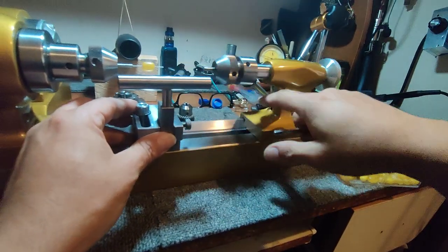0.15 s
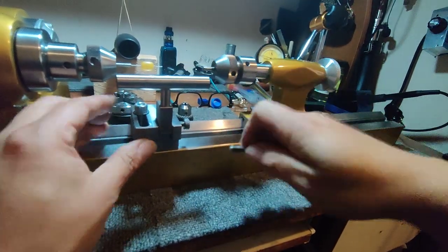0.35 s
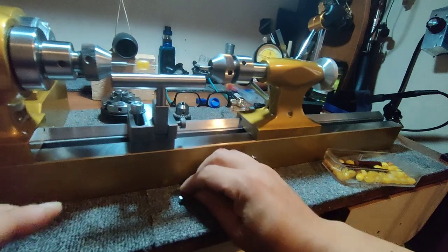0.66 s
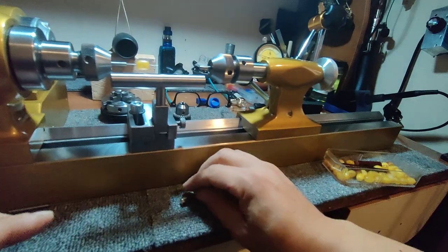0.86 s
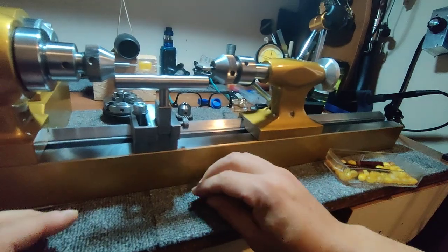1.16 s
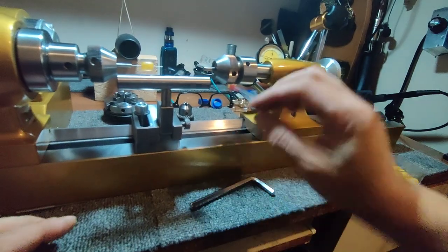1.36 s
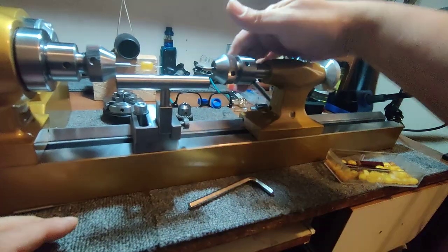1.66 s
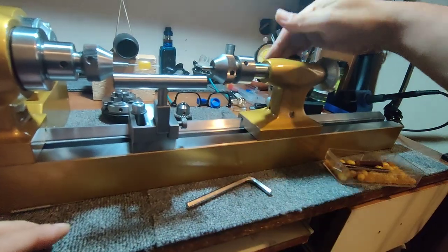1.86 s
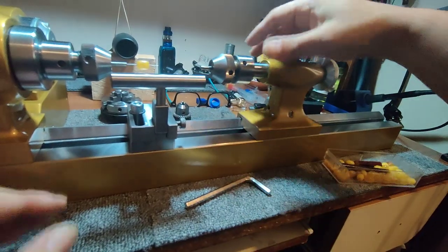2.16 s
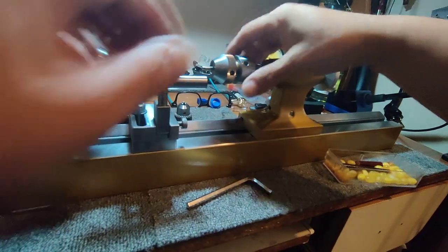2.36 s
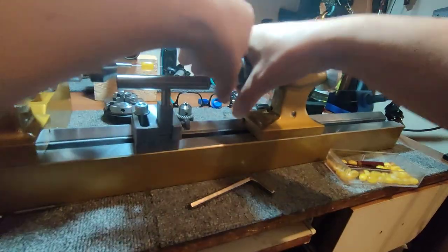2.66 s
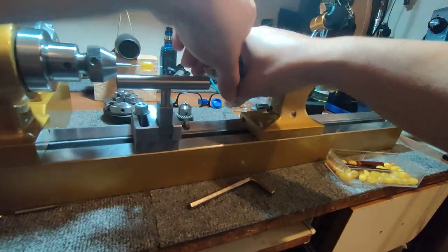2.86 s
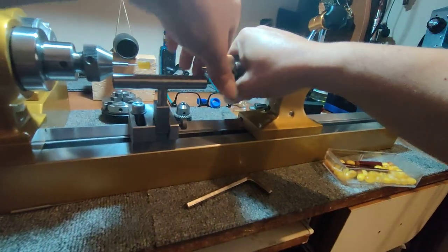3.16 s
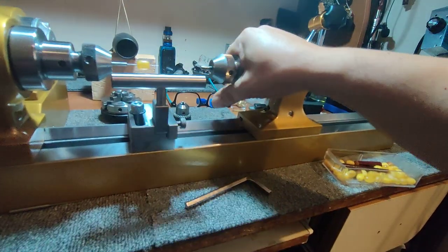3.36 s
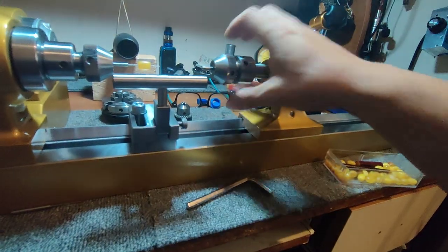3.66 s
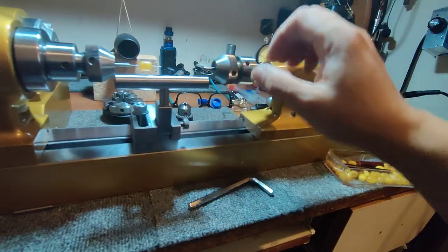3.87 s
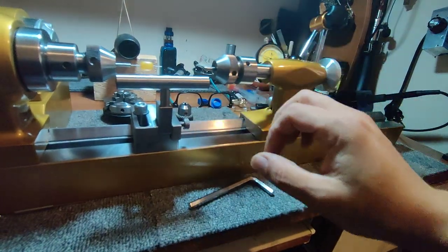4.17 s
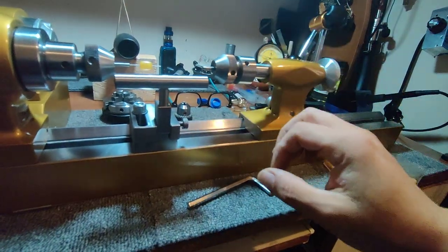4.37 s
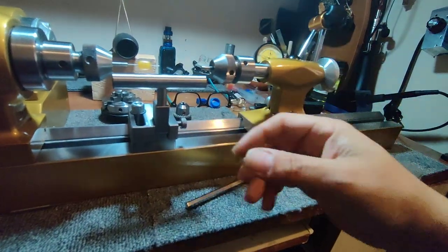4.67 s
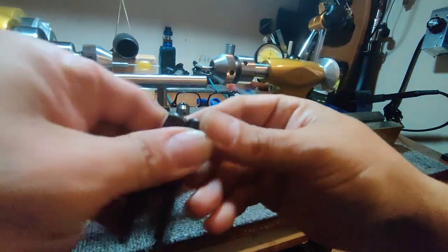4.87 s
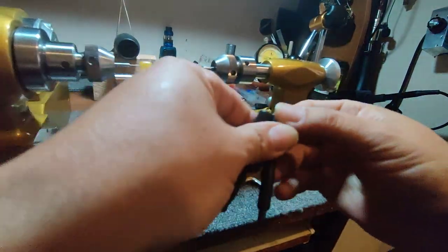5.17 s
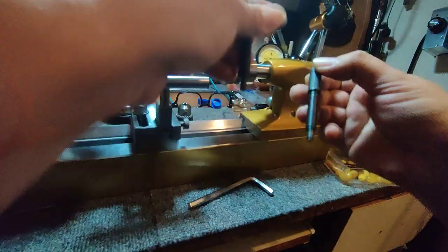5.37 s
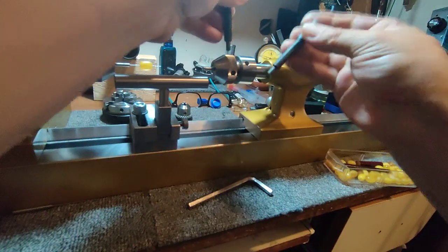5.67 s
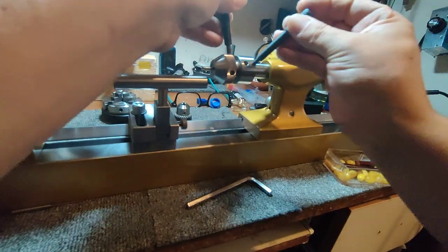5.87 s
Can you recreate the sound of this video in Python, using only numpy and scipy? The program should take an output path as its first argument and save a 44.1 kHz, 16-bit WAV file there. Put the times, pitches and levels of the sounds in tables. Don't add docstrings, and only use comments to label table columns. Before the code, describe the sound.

A quiet small workshop, close stereo microphone, short dry room reflections. The first 0.7 s is almost silent, with faint board taps and a tiny stick-slip squeak at 0.1-0.2 s. At 0.7 s a hex key lands on felt-covered wood: soft thud, thin clear ring; faint hiss then opens up. Light bumps at 1.25 s, low camera jolts and brushing near 1.7 s, a short scrape at 1.8 s, then dull metal-on-wood clunks at 1.85 and 1.92 s. Quiet handling and low rumbles follow, with a small tap and scrape near 3.15 s. At 4.1-4.45 s steel parts knock in rapid bright clicks, strongest at 4.18 s, with a sharp rub at 4.28 s. A faint breathy whistle slides from 4.45 to 5.1 s. At 5.0 s one very loud, crisp, damped pin click dominates. Tiny ticks continue to 5.65 s, then soft thumps and knocks at 5.9-6 s. A faint distant appliance hum lies beneath.

```python
import sys
import numpy as np
from scipy import signal
from scipy.fft import rfft, irfft
from scipy.io import wavfile
from scipy.ndimage import uniform_filter1d

SR = 44100
rng = np.random.default_rng(int(sys.argv[2]) if len(sys.argv) > 2 else 0)


def gain_from_db(level_db):
    decades = np.asarray(level_db, float) / 20
    return 10 ** decades


def transcribe(u):
    v = np.clip(np.atleast_2d(u).T, -1, 1)
    q = np.round(v * 32767).astype(np.int16)
    wavfile.write(sys.argv[1], SR, q)


N = 265041

# [f/Hz, level/dB per Hz]
CONTACT = [(350, -9.5), (600, -14.5), (1910, -10.5), (2160, -12.5), (2600, -7), (3230, -11.5), (6000, -12),
           (8290, -35.5), (15000, -57)]
# [f/Hz, level/dB per Hz]
TICK = [(530, -36), (900, -17), (1300, -4), (1630, -0.5), (3970, -10), (4620, 1.5), (7060, 1.5),
        (8760, -13), (12000, -45), (15600, -65.5), (22000, -120)]
# [t/s, peak level/dB, L-R level/dB]
KEY_DROPS = [
    (0.6923, -49.5, -1),
    (0.7021, -40, 10),
]
# [t/s, effort level/dB]
EFFORT = [(0.0, -72.5), (0.22, -73.5), (0.35, -84.5), (0.74, -91), (0.87, -74.5), (1.39, -71), (1.89, -66),
          (2.07, -69), (2.5, -71), (3.1, -62.5), (3.31, -68), (3.97, -71.5), (4.25, -60), (4.45, -66.5),
          (4.67, -69.5), (5.12, -65.5), (5.51, -63), (6.01, -69.5)]


def evened(x):
    return x / np.sqrt(np.mean(x ** 2) + 1e-20)


def read(points, hz):
    f, value = np.transpose(points)
    return np.interp(np.log(hz + 1), np.log(f + 1), value)


def column(rows, t, order=1):
    return np.interp(t, np.array(rows)[:, 0], np.array(rows)[:, order])


def add(mix, s, sound, pan_db, lag):
    for side, sign in enumerate((1, -1)):
        start = max(round(s * SR + sign * lag / 2), 0)
        part = mix[side, start:][:len(sound)]
        part += gain_from_db(sign * pan_db / 2) * sound[:len(part)]


def ring(modes, spread_db=0, rise=.0003, length=.9):
    hz, db, t60 = np.transpose(modes)[:, :, None]
    t = np.arange(round(length * SR)) / SR
    level_chance, phase_chance = rng.standard_normal((2, len(hz), 1))
    decay = gain_from_db(db + spread_db * level_chance - 60 * t / t60)
    x = (decay * np.sin(2 * np.pi * hz * t + spread_db * phase_chance)).sum(0)
    x = x * (1 - np.exp(-t / rise))
    return x / abs(x).max()


def crack(colour, t60, rise=0.00019, size=4096):
    t = np.arange(size) / SR
    gain = gain_from_db(read(colour, np.fft.rfftfreq(size, 1 / SR)))
    x = irfft(rfft(rng.standard_normal(size)) * gain)
    x = x * gain_from_db(-60 * t / max(t60, .003)) * (1 - np.exp(-t / rise))
    return x / abs(x).max()


def click(colour):
    x = np.roll(irfft(gain_from_db(read(colour, np.fft.rfftfreq(4096, 1 / SR)))), 24)
    impulse = x / abs(x).max() * (np.arange(len(x)) < 300)
    return impulse + 0.42 * np.roll(crack(colour, 0.0083), 24)


def resonate(x, hz, width):
    turn = np.exp(2j * np.pi * np.cumsum(hz * np.ones(len(x))) / SR)
    r = np.exp(-np.pi * width / SR)
    return 2 * (turn * signal.lfilter([1 - r], [1, -r], x / turn)).real


def tailstock_knocks():
    # [t/s, peak level/dB, ring level/dB, L-R level/dB]
    knocks = [(4.1237, -47.5, -3.5, -5), (4.137, -51, -20, 5), (4.1505, -41, -13, 1), (4.1575, -56, -20, 3),
              (4.164, -49, -16, 3), (4.1757, -21, -17, 10), (4.1783, -18, -13, 5), (4.1806, -23.5, -11, -2),
              (4.1843, -27, -8, 10), (4.1905, -44, -18, 3), (4.2455, -31.5, -10, 8.5), (4.268, -50, -24, 4),
              (4.271, -37, -19, 8), (4.2745, -48, -21, 4), (4.2785, -37, -12, 13), (4.283, -29, -9, 12),
              (4.2872, -27.5, -20, 10), (4.2905, -28.5, -8, 6), (4.2945, -44, -18, 3), (4.299, -45, -22, 3),
              (4.305, -52, -20, 3), (4.3597, -36.5, -22, 8), (4.4105, -50, -16, -2),
              (4.4262, -38.5, -16, 6), (4.436, -43, -20, 8), (5.878, -46.5, -19, 5.5),
              (5.9665, -44.5, -10.5, 7)]
    # [f/Hz, level/dB per Hz]
    snap = [(590, -55), (1100, -23), (1900, -5), (3450, -7.5), (4300, 0.5), (6200, 7.5), (8100, -6),
            (8790, -25), (14900, -49), (16300, -67)]
    # [f/Hz, level/dB per Hz]
    glint = [(7000, -50), (9000, -2), (15000, -7), (16200, -40)]
    # [f/Hz, level/dB, t60/s]
    quill = [(2020, -17, .04), (4600, -16, .04), (6160, -11, .06), (7730, -7, .09), (7810, -3, .12),
             (7895, 0, .11), (8035, -5, .09)]
    hard_db, brightens_db_per_db = -7, 1.23
    out = np.zeros((2, N))
    for s, db, ring_db, pan_db in knocks:
        glint_db = db + brightens_db_per_db * (db - hard_db)
        add(out, s, gain_from_db(db) * click(snap), pan_db, lag=-20)
        add(out, s, gain_from_db(glint_db) * crack(glint, 0.0078, rise=.0001), pan_db, lag=-9)
        add(out, s, gain_from_db(db + ring_db) * ring(quill, spread_db=3.5, length=.4), pan_db, lag=-18)
    return out


def casting_clunks():
    # [t/s, peak level/dB, ring level/dB, L-R level/dB]
    clunks = [
        (1.851, -45, -11, 0),
        (1.859, -42, -9, 2),
        (1.863, -45, 7.5, 2),
        (1.9138, -31.5, -2.5, 8),
        (1.9175, -32, -4.5, -9),
        (1.9205, -36, -5, -11),
        (4.0885, -58, -1, 6),
    ]
    # [f/Hz, level/dB, t60/s]
    casting = [(980, -1.5, 0.063), (1284, 8, 0.053), (1900, 0, 0.05), (2526, 0.5, .06), (3750, -7, 0.046),
               (5300, -4, 0.046), (5860, -14, 0.055), (6170, -6, 0.06)]
    out = np.zeros((2, N))
    for s, db, ring_db, pan_db in clunks:
        add(out, s, gain_from_db(db) * crack(CONTACT, 0.012, rise=0.00028), pan_db, lag=8.6)
        add(out, s, gain_from_db(db + ring_db) * ring(casting, spread_db=4.5, length=.2), pan_db, lag=8)
    return out


def pins_clink():
    # [f/Hz, level/dB]
    pins = [(150, -25), (620, -39), (1250, -46), (2300, -38), (2910, -27), (4300, -28), (5340, -24),
            (6200, -5), (7250, 0), (8900, -29), (10400, -28), (11200, -31), (12600, -36), (14700, -34)]
    # [f/Hz, level/dB, t60/s]
    pins_after = [(6030, -7, .03), (7000, -6, .03), (7120, 0, .03), (7800, -4.5, 0.025), (8600, -20.5, .06),
                  (10350, -29, 0.077), (11300, -31, .09)]
    touch_s, press_s = 5.00098, .0012
    contact_s, early_s = 0.0012, 0.00033
    out = np.zeros((2, N))
    hz, db = np.transpose(pins)[:, :, None]
    t = np.arange(400) / SR - press_s
    x = (gain_from_db(db) * np.cos(2 * np.pi * hz * t)).sum(0)
    x = x * np.exp(-((t + early_s) / contact_s) ** 2)
    x = x * (1 - np.exp(-(t + press_s) / .0001))
    add(out, touch_s, gain_from_db(-2.5) * x / abs(x).max(), -1., lag=-1)
    after = ring(pins_after, spread_db=2, rise=.002, length=.12)
    add(out, touch_s + press_s, gain_from_db(-25.5) * after, -1., lag=-4)
    return out


def key_landings():
    out = np.zeros((2, N))
    for s, db, pan_db in KEY_DROPS:
        add(out, s, gain_from_db(db) * crack(TICK, 0.0096), pan_db, lag=2.1)
    return out


def key_ring():
    # [f/Hz, level/dB, t60/s]
    key_modes = [(1954, -19, 0.8), (3144, -2.5, 0.7), (4366, -2.5, 0.58), (6293, -11.5, 0.068),
                 (8575, -1.5, 0.13), (9398, -7, 0.16)]
    out = np.zeros((2, N))
    for s, db, pan_db in KEY_DROPS:
        tone = ring(key_modes)
        felt = 1 + 1.76 * np.exp(-np.arange(len(tone)) / (0.013 * SR))
        add(out, s, gain_from_db(db) * tone * felt, pan_db, lag=2.83)
    return out


def light_ticks():
    # [t/s, peak level/dB, pitch f/Hz, L-R level/dB]
    ticks = [
        (5.0442, -45, 6850, 10),
        (5.112, -53, 6200, 8),
        (5.135, -47, 2320, 5.5),
        (5.155, -55, 1850, 12),
        (5.239, -35, 6840, 2.5),
        (5.2555, -40, 6100, 6),
        (5.27, -46, 1920, -12),
        (5.3099, -51, 1590, 1.5),
        (5.611, -49, 6200, 1),
        (5.644, -52.5, 5930, 4),
    ]
    out = np.zeros((2, N))
    for s, db, hz, pan_db in ticks:
        tick = crack(TICK, t60=0.02)
        add(out, s, gain_from_db(db) * (tick + 1.46 * resonate(tick, hz, 416.7)), pan_db, lag=-2.5)
    return out


def screw_squeak():
    # [t/s, second partial f/Hz, level/dB]
    squeak = [
        (0.1, 1820, -96),
        (0.114, 1597, -79),
        (0.147, 1870, -67.5),
        (0.182, 1846, -69),
        (0.23, 1530, -82),
    ]
    # [start t/s, end t/s, f/Hz, level/dB]
    chirp = (.03, .07, 2370, -69)
    out = np.zeros((2, N))
    t = np.arange(squeak[0][0], squeak[-1][0], 1 / SR)
    jitter = 1.01 + 0.19 * uniform_filter1d(rng.standard_normal(len(t)), size=150)
    turns = np.cumsum(column(squeak, t) / 2 * jitter) / SR
    partials_db = (-7, 3, -20, -30)
    tone = sum(gain_from_db(db) * np.sin(2 * np.pi * k * turns) for k, db in enumerate(partials_db, 1))
    tone = tone * signal.windows.tukey(len(t), .15)
    add(out, t[0], gain_from_db(column(squeak, t, order=2)) * tone, 1.5, lag=-4.5)
    start, end, hz, db = chirp
    t = np.arange(start, end, 1 / SR)
    add(out, start, gain_from_db(db) * np.sin(2 * np.pi * hz * t) * np.hanning(len(t)), .5, lag=-6)
    return out


def tailstock_glide():
    # [t/s, resonance f/Hz, level/dB]
    glide = [
        (4.45, 1481, -67),
        (4.52, 1520, -63),
        (4.56, 1544, -60.5),
        (4.66, 1580, -61.5),
        (4.72, 1565, -65.5),
        (4.82, 1476, -73.5),
        (4.9, 1530, -78),
        (4.97, 1370, -70.5),
        (5.1, 1380, -80.5),
    ]
    out = np.zeros((2, N))
    t = np.arange(glide[0][0], glide[-1][0], 1 / SR)
    hz = column(glide, t)
    hum = resonate(resonate(rng.standard_normal(len(t)), hz, 70), hz, 90)
    hum = hum / np.sqrt(uniform_filter1d(hum ** 2, size=1500) + 1.1 * hum.var())
    hum = hum * signal.windows.tukey(len(t), .2)
    add(out, t[0], gain_from_db(column(glide, t, order=2)) * hum, .5, lag=-6.5)
    return out


def scrapes():
    # [t/s, length/s, centre f/Hz, width/Hz, rms level/dB]
    strips = [(1.018, 0.048, 5450, 2610, -74.5), (1.276, 0.028, 1810, 1800, -76),
              (1.707, 0.014, 1360, 1490, -63.5), (1.781, 0.029, 4440, 900, -68),
              (1.805, 0.018, 6050, 1190, -53.5), (1.854, 0.0175, 4500, 4160, -56),
              (1.854, 0.017, 980, 250, -47.5), (3.154, 0.048, 6250, 900, -63),
              (3.33, 0.041, 6100, 1200, -74.5), (3.949, 0.052, 1500, 1500, -74),
              (3.952, 0.043, 5750, 1000, -62), (4.085, 0.046, 1420, 1430, -59),
              (4.266, 0.034, 4900, 3970, -62), (4.125, 0.056, 6300, 1000, -59.5),
              (4.13, 0.084, 2700, 2500, -60.5), (4.402, 0.038, 1800, 500, -62),
              (4.894, 0.036, 1900, 1500, -71.5), (4.264, .038, 2010, 1490, -50),
              (4.75, 0.076, 4900, 3200, -69.5), (5.52, 0.032, 5100, 3490, -70)]
    out = np.zeros((2, N))
    for s, length, hz, width, db in strips:
        patches = evened(uniform_filter1d(rng.standard_normal(4096), size=40))
        grains = rng.standard_normal(4096) * gain_from_db(2.3 * patches)
        sound = evened(resonate(resonate(grains, hz, width), hz, width))[:round(length * SR)]
        add(out, s, gain_from_db(db) * sound * signal.windows.tukey(len(sound), .6), 5.5, lag=-2.5)
    return out


def bench():
    # [t/s, peak level/dB, boom level/dB, scuff level/dB, L-R level/dB]
    top_blows = [(0.017, -67.5, -22, -20, 2), (0.074, -59, 2.5, -10, -1), (0.265, -64.5, -23, -26, 8),
                 (0.326, -65, 0, -24, 2), (0.409, -73.5, 3.5, 6, -8), (0.697, -41, -2.5, -13, 0),
                 (1.241, -49.5, -7.5, -14.5, 13), (1.706, -50, -1, -26, 1), (1.767, -51, -26, -14, 5),
                 (1.852, -33.5, -18, -5.5, 0), (1.923, -32.5, 3.5, -22, -19), (3.117, -63, 3, -10, 3),
                 (3.175, -43.5, -20, -12, 0), (3.944, -63, -27, 12, 3), (4.288, -46, -32, 1.5, 17),
                 (4.361, -47, -18, 3, 3.5), (5.879, -42, -21.5, -10, 2), (5.908, -42, -32.5, -13.5, 6),
                 (5.968, -39.5, -11, -11, 3)]
    # [t/s, peak level/dB, boom level/dB, scuff level/dB, L-R level/dB]
    apron_blows = [
        (1.274, -50, -30, -1.5, -1),
        (1.913, -31, -0.5, 2, 3.5),
        (4.087, -44, -25, -9, -2),
        (4.11, -49.5, -11, -1.5, 4),
        (4.418, -48, -31, 1.5, 12),
    ]
    # [f/Hz, level/dB per Hz]
    boards_colour = [(88, -49), (150, -13.5), (188, -9.5), (424, -4.5), (724, -14.5), (800, -19.5),
                     (901, -12.5), (1120, -25), (1600, -26), (2080, -71), (3520, -120)]
    # [f/Hz, level/dB, t60/s]
    cabinet = [(116.8, -3.5, 0.15), (212.6, -11, 0.11), (77.8, -12, 0.18)]
    top_hz, apron_hz = 423, 250
    blows = [(top_hz, *row) for row in top_blows] + [(apron_hz, *row) for row in apron_blows]
    out = np.zeros((2, N))
    for hz, s, db, boom_db, scuff_db, pan_db in blows:
        boards = crack(boards_colour, 0.18, rise=0.0023, size=8192)
        boards = boards + 2.4 * resonate(boards, hz, 67)
        add(out, s, gain_from_db(db) * boards / abs(boards).max(), 0.12 * pan_db, lag=8)
        add(out, s, gain_from_db(db + boom_db) * ring(cabinet, rise=0.0084, length=.4), .1, lag=0)
        add(out, s, gain_from_db(db + scuff_db) * crack(CONTACT, 0.07, rise=0.001), pan_db, lag=4.8)
    return out


def walls(x):
    # [f/Hz, t60/s]
    wall_t60 = [(100, 0.29), (500, 0.13), (2000, 0.21), (6000, 0.14), (12000, 0.038)]
    taps = np.zeros((2, SR // 2))
    starts = np.arange(80, SR // 2 - 20, 20)
    at = starts + rng.integers(0, 20, (2, len(starts)))
    np.put_along_axis(taps, at, rng.choice([-1., 1.], at.shape), 1)
    hz, t, z = signal.stft(taps, SR, nperseg=256)
    z = np.where(hz[:, None] < 400, z[0], z)
    decay = gain_from_db(-60 * t / np.maximum(read(wall_t60, hz), .02)[:, None])
    tail = signal.istft(z * decay, SR, nperseg=256)[1]
    tail = tail * (1 - np.exp(-np.arange(tail.shape[1]) / (0.0042 * SR)))
    return signal.fftconvolve(x, tail / np.linalg.norm(tail[0]), axes=1)[:, :N]


def noise(colour, size, patchy_db):
    # [f/Hz, correlation/1]
    likeness = [(35, 0.37), (70, 0.47), (150, 0.8), (380, .79), (950, 0.0), (2380, 0.15), (15000, -0.094)]
    # [f/Hz, phase/rad]
    lead = [(60, 0), (640, -.5), (2330, -2.5), (16000, -3)]
    # [f/Hz, L-R level/dB]
    balance = [(60, 4), (180, -1.5), (550, -1.5), (1650, 0.0), (4970, 0.1), (15000, -0.5)]
    frames, hz = 4 * N // size + 5, np.fft.rfftfreq(size, 1 / SR)
    a, b, c, d, patches = rng.standard_normal((frames, len(hz), 5)).T
    patches = uniform_filter1d(patches, size=10, axis=0)
    patches = evened(uniform_filter1d(patches, size=12, axis=1))
    same = np.clip(read(likeness, hz), -.5, 1)[:, None]
    left = a + 1j * b
    right = same * left + np.sqrt(1 - same ** 2) * (c + 1j * d)
    right = right * np.exp(-1j * read(lead, hz))[:, None]
    lean = gain_from_db(read(balance, hz) / 2)[:, None]
    inside = ((hz >= colour[0][0]) & (hz <= colour[-1][0]))[:, None]
    gain = gain_from_db(read(colour, hz)[:, None] + patchy_db * patches) * inside
    z = np.array([left * lean, right / lean]) * gain
    return evened(signal.istft(z, nperseg=size, noverlap=3 * size // 4)[1][:, :N])


def steadied(x):
    return x / np.sqrt(uniform_filter1d((x ** 2).mean(0), size=5000) + .05)


def swells(top, rise, fall, db, rest_db):
    t = np.arange(0, N, 64)[:, None] / SR
    away = np.where(t < top, (top - t) / np.abs(rise), (t - top) / np.abs(fall))
    power = (gain_from_db(db - 12 * away) ** 2).sum(1)
    return np.sqrt(np.interp(np.arange(N) / SR, t[:, 0], power) + gain_from_db(rest_db) ** 2)


def rubbing():
    # [top t/s, rise/s, fall/s, level/dB]
    strokes = [
        (0.95, 0.17, 0.21, -75),
        (1.36, 0.33, 0.75, -70),
        (1.81, 0.5, 0.49, -66),
        (3.05, 1., 0.3, -70),
        (3.9, 0.68, 0.65, -70),
        (4.28, 0.12, 0.052, -56.5),
        (4.48, 0.39, 0.16, -63),
        (5.02, 0.098, 0.23, -67.5),
        (5.54, 0.63, 0.45, -66.5),
    ]
    # [f/Hz, level/dB per Hz]
    rub_colour = [(470, -40), (800, -9), (1570, -13), (1750, -0.5), (2450, 4.5), (3300, -0.5), (4250, 5),
                  (5100, 1), (6090, 4), (7280, -3), (7930, -19), (10000, -15.5), (13000, -54.5),
                  (22000, -120)]
    grain = gain_from_db(1.2 * evened(uniform_filter1d(rng.standard_normal(N), size=300)))
    rub = evened(noise(rub_colour, size=512, patchy_db=2.1) * grain)
    return swells(*np.transpose(strokes), rest_db=-91) * rub


def camera_shaking():
    # [top t/s, length/s, sway level/dB, frame level/dB]
    jolts = [(0.0, 0.17, -73, -85), (0.815, 0.076, -80, -58), (1.185, 0.35, -64.5, -62.5),
             (1.323, 0.075, -79, -60), (1.438, .15, -65, -70), (1.664, 0.051, -37, -43),
             (1.708, 0.04, -44, -40.5), (1.789, 0.043, -38.5, -69), (1.978, 0.19, -45.5, -46),
             (2.272, 0.097, -38.5, -57.5), (2.447, 0.13, -55.5, -77), (3.147, 0.19, -59, -55.5),
             (3.751, 0.049, -47.5, -80), (4.088, 0.032, -79, -53), (4.171, 0.041, -39.5, -65),
             (4.24, 0.042, -53, -50), (4.266, 0.069, -35, -49), (5.017, 0.088, -55, -59),
             (5.138, 0.11, -47.5, -57.5), (5.323, 0.097, -63, -60.5), (5.822, 0.57, -54.5, -57.5),
             (5.975, 0.087, -34, -48)]
    # [f/Hz, level/dB per Hz]
    sway_colour = [(10, -2.5), (18, 2.5), (35, -0.5), (48, -21)]
    # [f/Hz, level/dB per Hz]
    frame_colour = [(36, -24.5), (46, 3), (60, -1.5), (80, -21.5), (110, -29.5), (180, -23)]
    sway = noise(sway_colour, size=4096, patchy_db=4.5)
    frame = noise(frame_colour, size=4096, patchy_db=1.5)
    frame = evened(frame + .5 * frame[::-1])
    top, length, sway_db, frame_db = np.transpose(jolts)
    gated_db = -10.5 * (np.arange(N) / SR < 0.72)
    sway_gain = swells(top, length, length, sway_db, -69 + gated_db)
    frame_gain = swells(top, length, length, frame_db, -64 + gated_db)
    return sway_gain * steadied(sway) + frame_gain * steadied(frame)


def room_air():
    # [f/Hz, level/dB per Hz]
    room = [(53, -39), (90, -18), (154, -9), (206, -3.5), (297, 3.5), (327, -19.5), (397, -0.5),
            (540, -5.5), (779, -9.5), (1210, -14), (1360, -12.5), (1780, -16.5), (9000, -32),
            (11700, -52.5), (19800, -120)]
    effort_db = column(EFFORT, np.arange(N) / SR)
    return gain_from_db(effort_db + 2.0) * noise(room, size=2048, patchy_db=2.54)


def microphone_hiss():
    # [f/Hz, level/dB per Hz]
    hiss_colour = [(4100, -30), (7000, -2), (8200, -4), (12200, -2), (14100, -3), (15400, -5)]
    gate_s, opens_s = 0.72, 0.25
    hiss_db, gated_db, follows_db_per_db = -79, -9, 0.16
    t = np.arange(N) / SR
    shut = np.clip(1 - (t - gate_s) / opens_s, 0, 1)
    effort_rise_db = column(EFFORT, t) - EFFORT[0][1]
    gain = gain_from_db(hiss_db + shut * (gated_db + follows_db_per_db * effort_rise_db))
    return gain * noise(hiss_colour, size=512, patchy_db=1.2)


def appliance():
    # [f/Hz, width/Hz, level/dB]
    hum_lines = [(301, 18, -77.5), (381.2, 13, -81.5), (120.7, 9.6, -81.5)]
    lines = sum(gain_from_db(db) * evened(resonate(rng.standard_normal(N), hz, width)) for hz, width, db in hum_lines)
    return lines * gain_from_db(0.55 * (column(EFFORT, np.arange(N) / SR) + 70.0))


def scene():
    wood = bench()
    steel = tailstock_knocks() + casting_clunks() + pins_clink() + key_landings() + light_ticks() + scrapes()
    tones = screw_squeak() + tailstock_glide() + key_ring()
    reflections = walls(gain_from_db(-11) * wood + gain_from_db(-15.5) * steel + gain_from_db(-22) * tones)
    background = rubbing() + camera_shaking() + room_air() + microphone_hiss() + appliance()
    return wood + steel + tones + reflections + background


def band_limit(x):
    return signal.sosfilt(signal.butter(12, 16470, fs=SR, output="sos"), x)


def record(dry):
    mix = signal.oaconvolve(dry, signal.firwin(255, 16400, fs=SR)[None], "same")
    return band_limit(mix)


dry = scene()
out = record(dry)
transcribe(out)
```